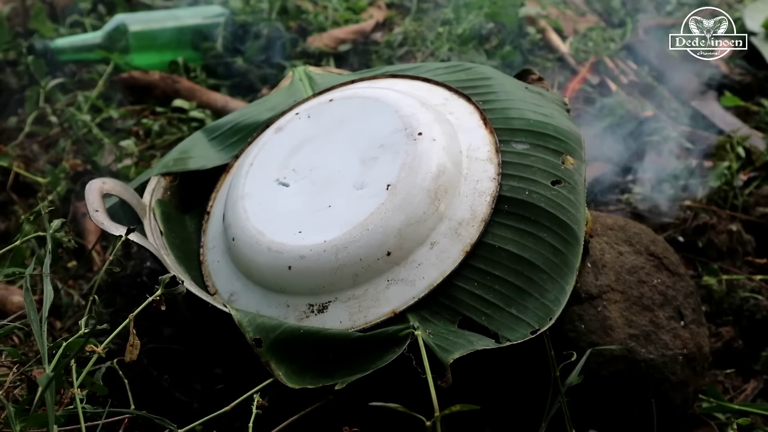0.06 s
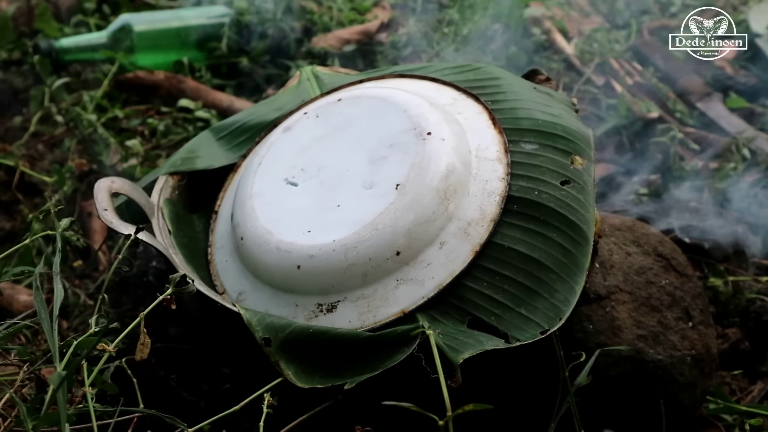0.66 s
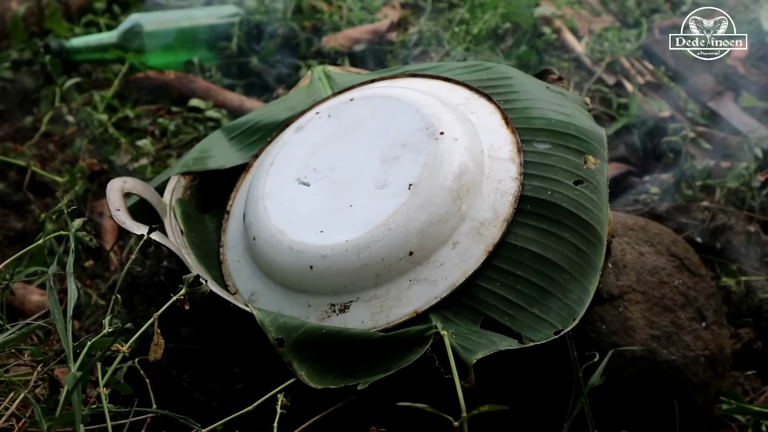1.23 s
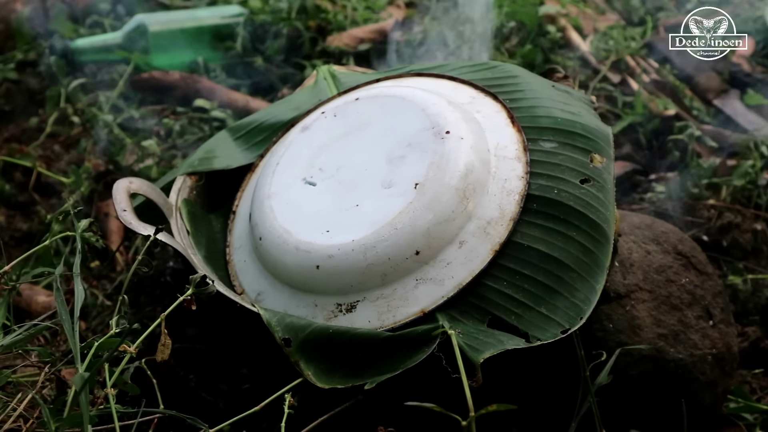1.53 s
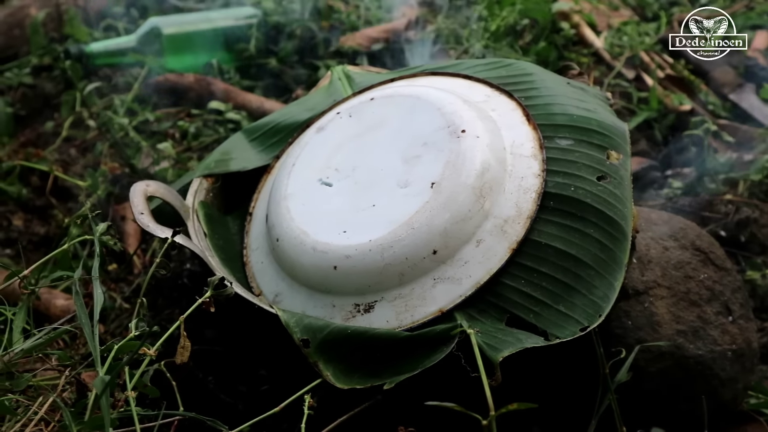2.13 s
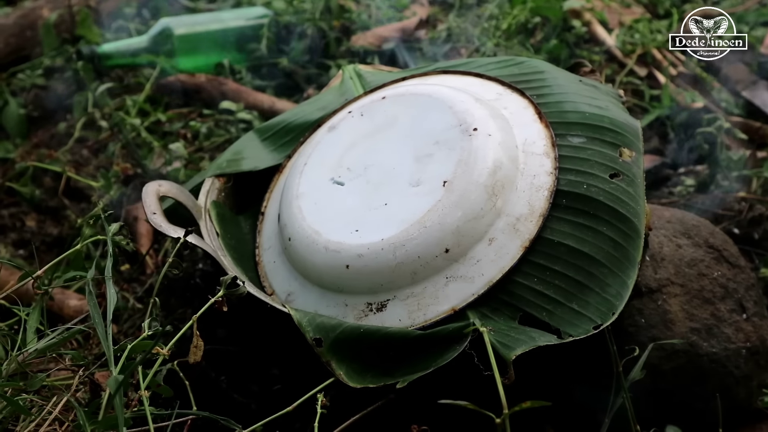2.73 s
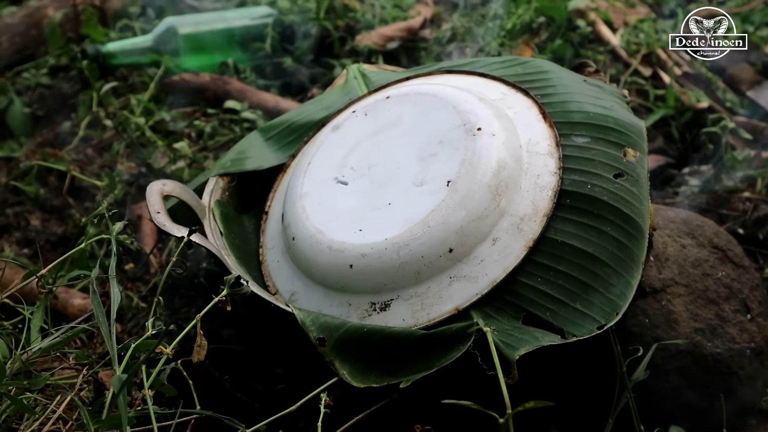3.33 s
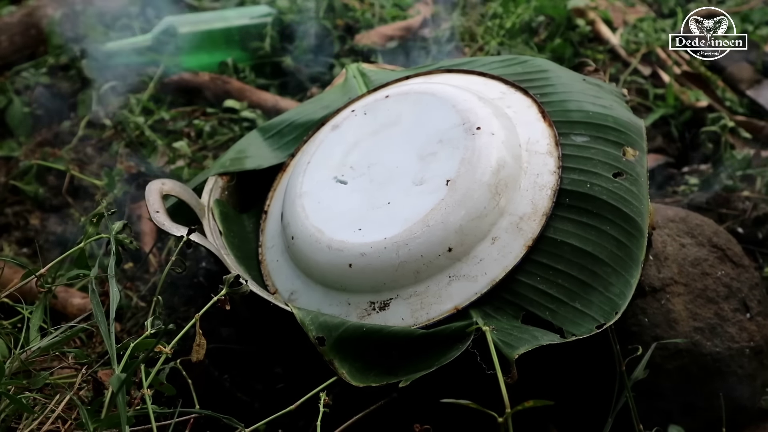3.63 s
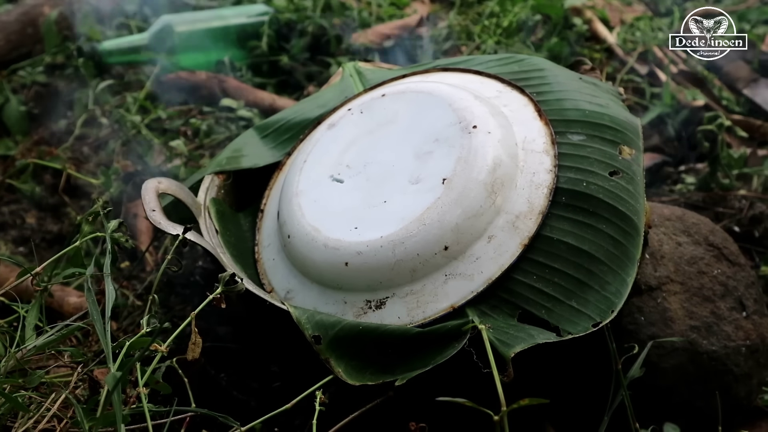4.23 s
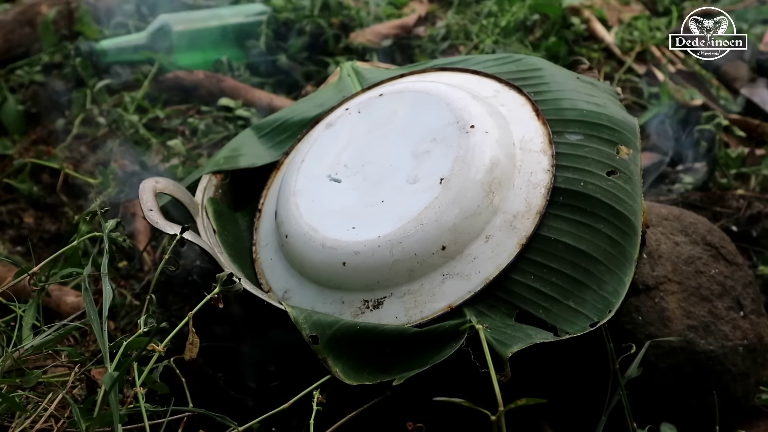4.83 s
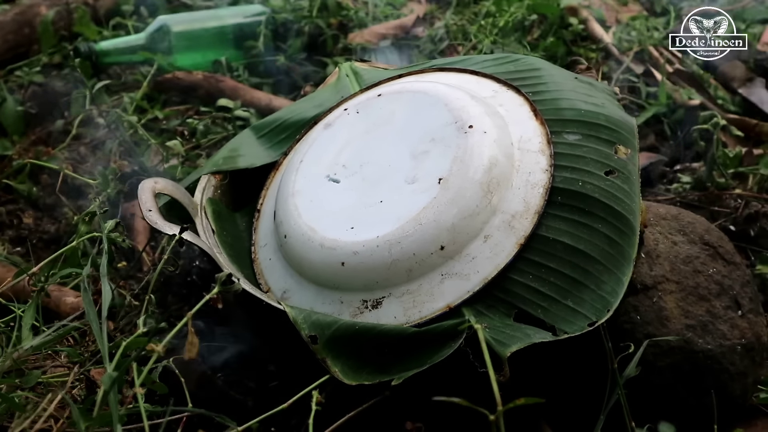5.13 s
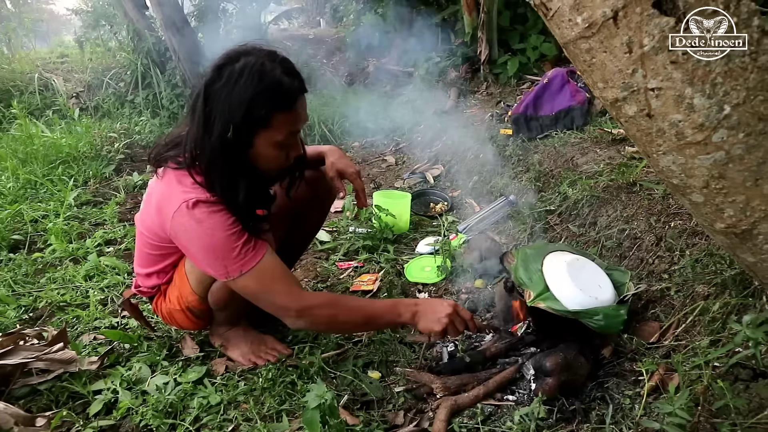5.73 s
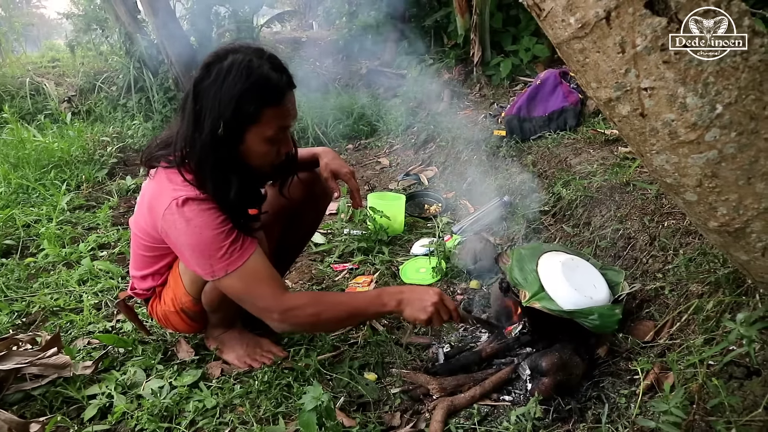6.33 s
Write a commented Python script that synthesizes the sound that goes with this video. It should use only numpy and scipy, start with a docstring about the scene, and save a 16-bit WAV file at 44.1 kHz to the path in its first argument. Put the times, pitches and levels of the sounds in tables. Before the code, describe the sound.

A covered pot sizzles steadily close by over a small outdoor wood fire. Juice spits on hot metal and small bubbles pop with a hollow ring under the lid. The burning wood gives scattered sharp cracks while an engine putters faintly far away. Near the end the sound briefly fades out and returns quieter, from a few steps back, with a soft hoot and faint chirps.

```python
"""A steady sizzle comes from a leaf-lined pot under an enamel plate, over a small wood fire outdoors.
Juice fizzes and spits on hot metal, and bursting bubbles make the air under the lid ring.
The wood cracks as its fibres snap, and an engine putters far away. Near the end the sound
fades out and returns from a few steps further back, with a soft hoot and faint chirps."""
import sys
import numpy as np
from scipy import signal
from scipy.fft import rfft, irfft, next_fast_len
from scipy.io import wavfile

SR = 44100
rng = np.random.default_rng(int(sys.argv[2]) if len(sys.argv) > 2 else 0)


def to_wav(sig):
    """Store sig (one row per channel, or 1-D mono) as 16-bit WAV at the path in sys.argv[1].

    Samples outside -1..1 are clipped; the rate is SR.
    """
    pcm = np.clip(np.atleast_2d(sig), -1, 1) * 32767
    pcm = np.round(pcm).astype(np.int16)
    wavfile.write(sys.argv[1], SR, pcm.T)  # frames by channels


N = 285327
TIME = np.arange(N) / SR
STEP_BACK_S = 5.3   # from here on the listener stands further back


def from_db(db):
    return 10 ** (np.asarray(db) / 20)

def rms_one(x):
    """Scales a sound to an average strength (rms) of 1."""
    return x / np.sqrt(np.mean(x ** 2) + 1e-20)

def in_time(rows):
    """The columns of a curve, at every sample."""
    s, *columns = np.transpose(rows)
    return [np.interp(TIME, s, column) for column in columns]

def filtered(x, gain):
    """Applies a gain that depends on frequency."""
    size = next_fast_len(N + 4096)
    return irfft(rfft(x, size) * gain(np.fft.rfftfreq(size, 1 / SR)), size)[..., :N]

def coloured(x, spectrum):
    """Gives a sound a tone colour; rms 1."""
    log_hz, db = np.log(np.array(spectrum)[:, 0]), np.array(spectrum)[:, 1]
    return rms_one(filtered(x, lambda hz: from_db(np.interp(np.log(hz + 1e-9), log_hz, db))))

def low_cut(x, hz):
    return signal.sosfilt(signal.butter(2, hz, "high", fs=SR, output="sos"), x)

def drift(hz):
    """A smooth random wander, typically 1 away from zero."""
    pole = np.exp(-80 * np.pi * hz / SR)
    slow = signal.lfilter([1], [1, -2 * pole, pole * pole], rng.standard_normal(N // 40 + 2002))[2000:]
    return np.interp(np.arange(N) / 40, np.arange(len(slow)), rms_one(slow))

def resonance(x, hz, width):
    """Lets through the sound around one pitch."""
    return signal.lfilter(*signal.iirpeak(min(hz, .45 * SR), hz / min(width, .4 * SR), fs=SR), x)

def cavity(x, modes):
    """A hollow rings at its own pitches, called modes; rms 1."""
    return rms_one(sum(from_db(db) * resonance(x, hz, width) for hz, width, db in modes))

def ringing(hz, t60, db):
    """A struck tone that dies away by 60 dB in t60 seconds."""
    t = np.arange(4096) / SR
    return from_db(db - 60 * t / t60) * np.sin(2 * np.pi * hz * t)

def grains(per_s, spread_db, largest):
    """Random tiny bursts, many small and a few large; rms 1."""
    born = rng.random(N) < per_s / SR
    sizes = from_db(spread_db * np.minimum(rng.exponential(1, N), largest))
    return rms_one(born * sizes * rng.choice([-1, 1], N))

def add(out, s, sound):
    """Mixes a short sound in at time s."""
    start = round(s * SR)
    out[start:start + len(sound)] += sound[:max(N - start, 0)]

def by_chance(per_s, db=0, spread_db=0):
    """Events that each take a random while to build up: (time [s], level [dB])."""
    times = .01 + np.cumsum(rng.gamma(2, .5, 120)) / per_s
    rows = np.column_stack([times, db + spread_db * rng.standard_normal(120)])
    return rows[times < N / SR]

def small_sounds(per_s, db, spread_db, hz, spread_octaves=0.17, step_back_db=-6):
    """Random events, weaker from further back: (time [s], level [dB], pitch [Hz])."""
    pitches = hz * 2 ** (spread_octaves * rng.standard_normal(120))
    return [(s, level + step_back_db * (s > STEP_BACK_S), pitch)
            for (s, level), pitch in zip(by_chance(per_s, db, spread_db), pitches)]

def flicks(rows, half_length_s, rise_hz_per_s):
    """Very short tones that slide upward."""
    out, t = np.zeros(N), np.arange(-700, 700) / SR
    for s, db, hz in rows:
        swell = from_db(db) * np.exp(-(t / half_length_s) ** 2)
        add(out, s + t[0], swell * np.sin(2 * np.pi * (hz + rise_hz_per_s * t / 2) * t))
    return out


# open air and the flames' low flutter: (frequency [Hz], relative level [dB])
AIR_COLOUR = [(20, -34), (40, -23.5), (62, -15.5), (100, -7.5), (150, 0.5), (200, 0.5), (300, 0), (450, -3),
              (600, -8), (1000, -11.5), (3000, -53), (14000, -36)]
# the part that differs between the ears: (frequency [Hz], relative level [dB])
AIR_SIDE_COLOUR = [(20, -14.5), (60, -8), (125, 2), (250, 7), (450, 7.5), (800, 4), (1300, -2.5),
                   (2500, -38.5), (6000, -72), (13000, -26.5)]
def air(near):
    """A low wash of flame and surroundings, slightly different at each ear."""
    mid, side = rng.standard_normal((2, N))
    mid = from_db(np.where(near, -45.5, -50) + 0.46 * drift(22)) * coloured(mid, AIR_COLOUR)
    side = from_db(np.where(near, -61, -58)) * coloured(side, AIR_SIDE_COLOUR)
    return mid + side * [[1], [-1]]

# the engine's loudness: (time [s], level before the step back [dB], low tones' lead over high [dB])
ENGINE_LEVELS = [(0, -46, -7.5), (.45, -46.5, 2), (1.1, -48, 8), (2.7, -51.5, 4), (3.6, -49, -5),
                 (3.95, -49, 2), (4.15, -43.5, 0.5), (5.2, -46, 1)]
# its speed: (time [s], firings [1/s])
FIRING_RATE = [(0, 32.6), (.3, 33.6), (.65, 35.6), (1.3, 34.6), (2.7, 34.8), (3.6, 35.5), (4.2, 35.3),
               (4.7, 35), (5.2, 34.2)]
# its exhaust tones: (pitch [times the firing rate], relative level [dB])
EXHAUST_TONES = [(4, -6), (5, -2.5), (6, 1.5), (7, -5.5), (8, -11.5), (10, -10), (11, -9.5)]
def engine(near, waver_db=3.0, step_back_db=-29):
    """Only the low exhaust tones carry this far, each wavering on its way."""
    level_db, lead_db = in_time(ENGINE_LEVELS)
    rate, = in_time(FIRING_RATE)
    phase = 2 * np.pi * np.cumsum(rate * (1 + 0.00502 * drift(6.0))) / SR
    tones = 0
    for multiple, db in EXHAUST_TONES:
        tone_db = db + waver_db * drift(4) + lead_db * (.5 if multiple <= 5 else -.5)
        tones += from_db(tone_db) * np.sin(multiple * phase + rng.uniform(0, 2 * np.pi))
    return from_db(level_db + np.where(near, 0, step_back_db)) * rms_one(tones)

# one soft note: (time [s], pitch [Hz], relative level [dB], ring time [s])
HOOT = [(5.404, 900, -33, .12)]
def hoot(rise_s=0.0064, sag_hz_per_s=450, boost_db=4):
    """A brief, slightly falling hoot, perhaps a far bird."""
    s, hz, db, t60 = HOOT[0]
    age = np.maximum(TIME - s, 0)
    swell = (1 - np.exp(-age / rise_s)) ** 2 * from_db(db + boost_db - 60 * age / t60)
    return swell * np.sin(2 * np.pi * (hz - sag_hz_per_s * age / 2) * age)

# high calls: (time [s], level [dB], pitch [Hz])
FAINT_CHIRPS = [(5.366, -39.5, 2960), (5.626, -36, 2880), (5.815, -38, 2980)]
def chirps():
    """Faint rising chirps, perhaps a small bird."""
    return flicks(FAINT_CHIRPS, half_length_s=0.003, rise_hz_per_s=45000)

# a low puff: (time [s], pitch [Hz], ring time [s], level [dB])
GAS_PUFF = (1.546, 300, .035, -32)
def gas_puff():
    """Gas puffs out of the wood with the largest crack."""
    out = np.zeros(N)
    s, hz, t60, db = GAS_PUFF
    add(out, s, ringing(hz, t60, db))
    return out

# a stick's own tones: (base pitch [Hz], ring time [s], relative level [dB])
STICK_TONES = [(543, 0.032, -35.5), (684, 0.024, -28.5), (2220, 0.025, -32)]
# pops in the wood: (time [s], boost [dB], pitch [times the base pitch])
STICK_POPS = [(1.2343, 2, 1), (1.5525, 3.5, 1.54)]
def knocks():
    """One pop sets a whole stick ringing, a thinner stick higher."""
    out = np.zeros(N)
    for s, boost_db, pitch in STICK_POPS:
        add(out, s, sum(ringing(hz * pitch, t60, db + boost_db) for hz, t60, db in STICK_TONES))
    return low_cut(out, hz=400)

# the wood cracks: (time [s], relative peak [dB], pitch [Hz], tail offset [dB], low edge [Hz])
WOOD_CRACKS = [(0.1503, -11, 3900, -14, 550), (0.27, -13, 4600, -14, 1500), (0.2722, -13, 4200, -9.5, 1800),
               (0.3204, -8.5, 7700, -19, 5000), (0.3325, -15, 8100, -22, 5500),
               (0.4591, -23, 8500, -9, 5050), (0.513, -19, 6000, -12, 2500), (0.866, -17, 5170, -12, 2000),
               (1.2343, -11, 2600, -16, 450), (1.2638, -20, 3400, -11, 700), (1.54, -15, 3200, -16, 600),
               (1.5463, -14, 4200, -8, 2000), (1.5477, -9, 4400, -9, 1500), (1.5484, -4, 3600, -17, 1100),
               (1.5515, -11, 4400, -12, 1500), (1.5536, 0, 4200, -13, 1600), (1.5595, -17, 4000, -18, 1500),
               (1.9344, -14, 4800, -12, 1000), (2.8828, -21, 9000, -11, 4500),
               (3.4894, -10, 4900, -16.5, 500), (3.5915, -19, 2200, -10, 650),
               (4.1723, -15, 3000, -13, 800), (4.3693, -20, 8500, -12, 4000),
               (4.434, -5.5, 4200, -16, 2100), (4.693, -9, 3800, -17.5, 1500),
               (4.6953, -19, 9500, -7, 4500), (5.0847, -13, 4800, -15, 1600),
               (5.4492, -24, 6180, -12, 4000), (5.4876, -21, 3400, -20, 2000),
               (5.9761, -29, 5470, -13, 3500), (6.1267, -25, 7500, -9, 4000), (6.1654, -26, 5600, -9, 3000),
               (6.1873, -23, 7700, -12, 4000), (6.311, -18, 3540, -8, 900), (6.3972, -26, 6500, -8, 4000),
               (6.444, -22, 7400, -8, 2980)]
def cracks(tail_t60=0.015, tail_db=2.4, snap_db=-0.3, thin_tail_db=-12.5, thin_edge_hz=3000):
    """A fibre snaps with one sharp pressure swing; sticks, stones and pot scatter a faint tail."""
    out, t = np.zeros(N), np.arange(-44, 2004) / SR
    thin_fibres = small_sounds(per_s=14, db=-27.5, spread_db=2.5, hz=7000)
    events = [*WOOD_CRACKS, *[(*row, thin_tail_db, thin_edge_hz) for row in thin_fibres]]
    for (s, db, hz, offset_db, low_hz), noise in zip(events, rng.standard_normal((160, len(t)))):
        band = signal.butter(2, [low_hz, 12000], "band", fs=SR, output="sos")
        phase = t * hz * np.pi * np.sqrt(2)
        swing = phase * np.exp(-phase ** 2)
        steep_front = np.gradient(np.gradient(np.sign(phase) * np.exp(-np.abs(phase))))
        snap = signal.sosfilt(band, swing / swing.max() - 0.27 * steep_front)
        snap *= from_db(db + snap_db) / np.abs(snap).max()
        scattered = rms_one(signal.sosfilt(band, resonance(noise, hz, width=2.2 * hz)))
        tail = scattered * np.clip(phase / np.pi - .5, 0, 1) * from_db(-60 * t / tail_t60)
        add(out, s + t[0], snap + from_db(db + offset_db + tail_db) * tail)
    return out

# the tones of a squeak: (time [s], level [dB], pitch [Hz])
SQUEAK_TONES = [(0.708, -31, 5520), (0.708, -33, 7190)]
def steam_squeak():
    """Steam squeaks through a gap under the lid."""
    return flicks(SQUEAK_TONES, half_length_s=0.0022, rise_hz_per_s=20000)

# the two low tones of the air under the lid: (pitch [Hz], width [Hz], relative level [dB])
LID_LOW_TONES = [(384, 36.6, 2.5), (1116, 64, -3)]
# the same from further back: (pitch [Hz], width [Hz], relative level [dB])
LID_FAR_TONES = [(382, 57, -6.5), (1137, 74, -1)]
def bubbling(near, close_db=-44, far_db=-51.5):
    """Small bubbles collapse in the stew and keep the air under the lid ringing."""
    pops = grains(per_s=700, spread_db=3.0, largest=1.77) * from_db(drift(9.3))
    close = from_db(close_db) * cavity(pops, LID_LOW_TONES)
    far = from_db(far_db) * cavity(pops, LID_FAR_TONES)
    return np.where(near, close, far)

# the biggest bubbles: (time [s], lower tone's level [dB], upper tone's level [dB])
BIGGEST_BUBBLES = [(0.459, -37, -33), (0.513, -35, -33.5), (0.82, -32.5, -47), (0.953, -30.5, -46),
                   (1.261, -30, -42), (1.47, -29.5, -37), (2.149, -29, -42), (2.247, -35, -33),
                   (2.787, -29.5, -38), (3.16, -29, -44), (3.304, -27, -35), (3.59, -31, -30),
                   (4.11, -26, -31), (4.172, -37, -30), (4.287, -27, -42), (4.413, -29, -42),
                   (4.56, -34, -31), (4.692, -34, -36), (4.861, -42, -33), (5.075, -29.5, -33),
                   (5.16, -30.5, -30.5), (5.48, -55, -41), (5.824, -50, -39), (5.957, -43, -43),
                   (6.24, -55, -37), (6.294, -47, -40), (6.405, -52, -38)]
# lesser bubbles, one row for each tone: (level close by [dB], level further back [dB], spread [dB])
LESSER_BUBBLES = [(-34, -45.5, 1.5), (-40, -43.5, 1.5)]
def big_bubbles(lesser_per_s=12, t60=0.066, pitch_spread=0.022):
    """Each burst strikes both low tones under the lid; the froth shifts their pitch a little."""
    out = np.zeros(N)
    times = by_chance(lesser_per_s)[:, 0]
    for tone, (near_db, far_db, spread_db) in enumerate(LESSER_BUBBLES):
        hz = LID_LOW_TONES[tone][0]
        lesser = [(s, (near_db if s < STEP_BACK_S else far_db) + spread_db * luck)
                  for s, luck in zip(times, rng.standard_normal(170))]
        biggest = [(s, levels[tone]) for s, *levels in BIGGEST_BUBBLES]
        for (s, db), shift in zip(biggest + lesser, rng.standard_normal(170)):
            add(out, s, ringing(hz * (1 + pitch_spread * shift), t60, db))
    return low_cut(out, hz=200)

# high tones of the air under the lid, also in the sizzle: (pitch [Hz], width [Hz], relative level [dB])
LID_HIGH_TONES = [(2000, 110, 7.5), (2510, 55, 8), (3060, 70, 9.5), (3320, 90, 10.5), (3790, 160, 10.5),
                  (4330, 55, 10), (4680, 220, 6), (5165, 100, 7), (5780, 200, 4.5), (6330, 200, 2),
                  (7210, 120, 4)]
# the largest drops of juice on hot metal: (time [s], relative level [dB], pitch [Hz])
BIG_DROPS = [(0.061, -39, 3750), (0.237, -35, 3550), (0.256, -38, 3950), (0.485, -38, 3600),
             (0.521, -39, 4400), (0.611, -36, 4600), (0.725, -37, 5650), (0.759, -38, 4850),
             (0.911, -33, 3600), (0.949, -36, 3700), (1.031, -32, 3950), (1.096, -38, 3900),
             (1.126, -37, 4900), (1.14, -38, 3250), (1.266, -34.5, 3550), (1.528, -37, 3850),
             (1.694, -36, 4550), (1.934, -39, 6400), (2.177, -39, 3900), (2.455, -37, 3350),
             (2.497, -39, 4350), (2.59, -37, 3650), (3.086, -37, 4650), (3.342, -39, 5550),
             (3.593, -41, 2000), (3.82, -32, 3620), (3.868, -39, 4400), (3.88, -31.5, 3520),
             (3.903, -37, 3580), (3.984, -39, 3850), (4.015, -36, 4900), (4.031, -38, 4600),
             (4.113, -37, 3750), (4.174, -33, 3100), (4.562, -36, 4700), (4.644, -39, 5150),
             (4.801, -38, 4450), (4.869, -35, 4100), (5.044, -39, 3300)]
def spits(rise_s=0.0014, t60=0.022, lead_s=0.003, boost_db=3.8, reach_octaves=0.14, rasp_db=-9):
    """A drop flashes to steam: a short rasp that rings the pot's air tones nearest its pitch."""
    out, t = np.zeros(N), np.arange(2048) / SR
    swell = (1 - np.exp(-t / rise_s)) ** 2 * from_db(-60 * t / t60)
    tone_hz = np.array(LID_HIGH_TONES)[:, 0]
    small_drops = small_sounds(per_s=16, db=-43.2, spread_db=1.5, hz=4100)
    drops = [*BIG_DROPS, *[row for row in small_drops if row[0] < STEP_BACK_S]]
    noises = rng.standard_normal((170, len(t)))
    variations = rng.standard_normal((170, 3, len(tone_hz)))
    for (s, db, hz), noise, (strength, shift, phase) in zip(drops, noises, variations):
        closeness = np.exp(-(np.log2(tone_hz / hz) / reach_octaves) ** 2)
        share = closeness * from_db(2 * strength) + 1e-12
        tones = np.sin(2 * np.pi * (np.outer(tone_hz * (1 + 0.008 * shift), t) + phase[:, None]))
        rasp = rms_one(resonance(noise, hz, width=hz / 2))
        spit = share @ tones / np.linalg.norm(share) + from_db(rasp_db) * rasp
        add(out, s - lead_s, from_db(db + boost_db) * swell / swell.max() * spit)
    return out

def fine_crackle(decay_s=0.0011):
    """Tiny ticks in the fizz, each starting at once and scattering for a moment; rms 1."""
    clicks = grains(per_s=120, spread_db=2.0, largest=2.2)
    power = signal.lfilter([1], [1, -np.exp(-1 / (decay_s * SR))], clicks ** 2 + 1e-18)
    scatter = rms_one(np.sqrt(power) * rng.standard_normal(N))
    return rms_one(resonance(scatter + 0.45 * clicks, hz=6500, width=8000))

# borders of the bands that fizz in their own little flurries: (frequency [Hz])
BAND_EDGES = [300, 2760, 5600, 9300, 16000]
# depth of those flurries, lowest band first: (level swing [dB])
BAND_SWINGS = [0.9, 0.5, 0.8, 1.0]
# echoes between pot wall and lid: (delay [s], gain [factor])
LID_ECHOES = [(.00131, 0.09), (.00237, 0.084), (.00413, .08)]
# the sizzle's tone colour close by: (frequency [Hz], relative level [dB])
NEAR_COLOUR = [(300, -38), (600, -2), (1400, 4), (1650, -0.5), (2050, 2), (2800, 1.5), (4500, 2),
               (6300, 1.2), (8100, -2.5), (9700, 4.5), (10500, 3), (11200, -2), (12700, -1.5), (14200, -9),
               (15600, -15)]
# the same from further back: (frequency [Hz], relative level [dB])
FAR_COLOUR = [(300, -12.5), (550, -7), (900, -10.5), (1250, -10), (1600, -11.5), (2300, -12), (3000, -10.5),
              (4200, -12), (5500, -9.5), (7000, -14.5), (7500, -11.5), (8400, -17.5), (9300, -13),
              (11400, -15.5), (15400, -28)]
def sizzle(near, close_db=-38.8, hollow_db=-43.3, far_db=-42):
    """Thousands of droplets burst each second, in crackling flurries; some ring the pot's hollow."""
    fizz = grains(per_s=4000, spread_db=0.5, largest=4.0) + 0.49 * rng.standard_normal(N)
    surge_db = 0.45 * drift(6.7) + 0.8 * drift(76)
    flurries = 0
    for low, high, swing_db in zip(BAND_EDGES, BAND_EDGES[1:], BAND_SWINGS):
        band = filtered(fizz, lambda hz: (hz >= low) & (hz < high))
        flurries += band * from_db(surge_db + swing_db * drift(79))
    bursts = rms_one(flurries) + from_db(surge_db - 7.5) * fine_crackle()
    echoed = bursts + sum(gain * np.roll(bursts, round(s * SR)) for s, gain in LID_ECHOES)
    inner_pops = grains(per_s=900, spread_db=3.5, largest=2.7) * from_db(surge_db + 1.6 * drift(25))
    hollow = from_db(hollow_db) * cavity(inner_pops, LID_HIGH_TONES)
    close = from_db(close_db) * coloured(echoed, NEAR_COLOUR) + hollow
    far = from_db(far_db) * coloured(echoed, FAR_COLOUR)
    return np.where(near, close, far)

def scene():
    """Pot and fire straight ahead, in the open air."""
    near = TIME < STEP_BACK_S
    pot = sizzle(near) + bubbling(near) + big_bubbles() + spits() + steam_squeak()
    surroundings = engine(near) + air(near) + hoot() + chirps()
    fire = cracks() + knocks() + gas_puff()
    return surroundings + fire + pot

def gain_control(x, threshold_db=-4.7, release_db_per_s=9.5, lag_s=0.0075, smooth_s=0.01):
    """A very loud peak slips through, then turns the volume down, and it creeps back up."""
    over_db = np.maximum(20 * np.log10(np.abs(x).max(axis=0) + 1e-9) - threshold_db, 0)
    held_db = np.maximum.accumulate(over_db + release_db_per_s * TIME) - release_db_per_s * TIME
    late_db = np.interp(TIME - lag_s, TIME, held_db)
    pole = np.exp(-1 / (smooth_s * SR))
    return x * from_db(-signal.lfilter([1 - pole], [1, -pole], late_db))

# the fade out and return around the step back: (time [s], gain [factor])
STEP_BACK_FADE = [(5.19, 1), (5.24, .45), (5.262, 0), (5.346, 0), (5.348, 1)]
def record(dry, cutoff_hz=15700):
    """Gain control, the fade between the two positions, and a steep cut of the highest treble."""
    faded = gain_control(dry) * in_time(STEP_BACK_FADE)[0]
    return filtered(faded, lambda hz: 1 / np.sqrt(1 + (hz / cutoff_hz) ** 200))


dry = scene()
out = record(dry)
to_wav(out)
```